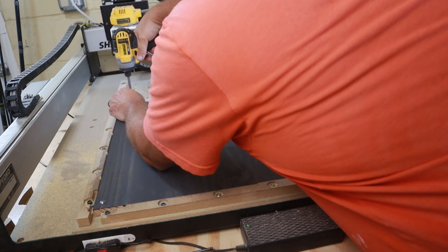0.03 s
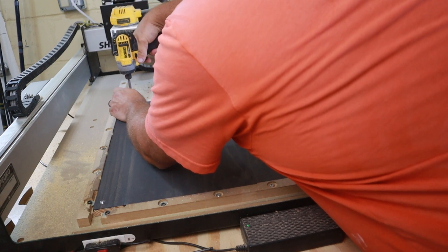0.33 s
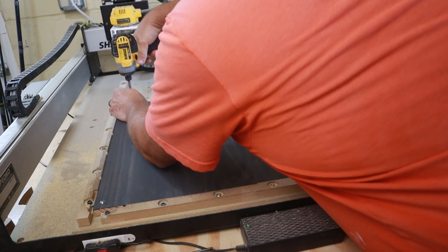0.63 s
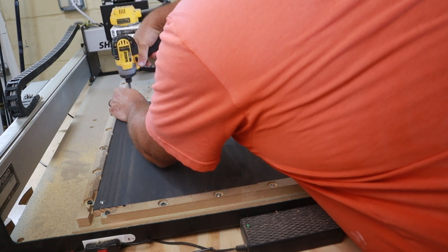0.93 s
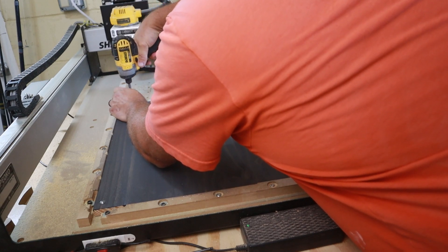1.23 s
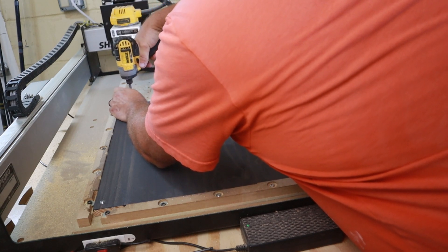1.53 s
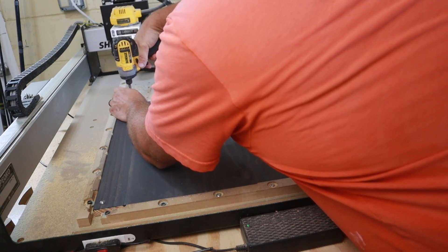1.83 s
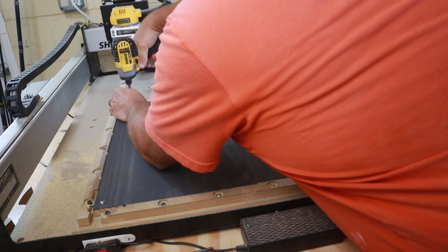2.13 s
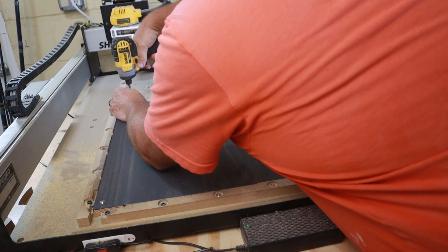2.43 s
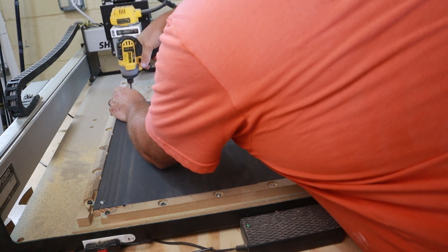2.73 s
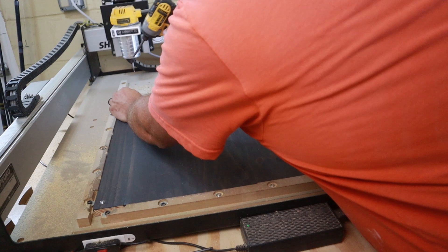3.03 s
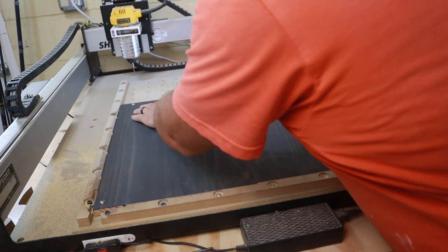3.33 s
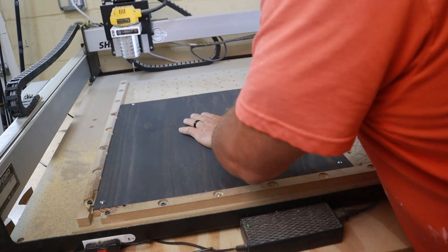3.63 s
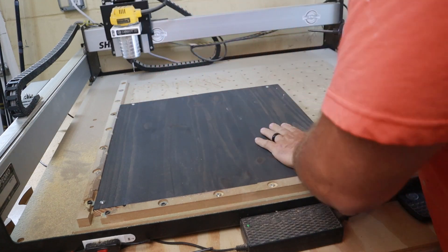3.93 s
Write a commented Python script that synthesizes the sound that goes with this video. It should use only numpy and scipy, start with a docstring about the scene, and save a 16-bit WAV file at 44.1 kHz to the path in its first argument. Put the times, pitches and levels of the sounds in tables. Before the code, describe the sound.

A cordless drill whirs in short bursts, then its clutch ratchets as the screw tightens.

```python
"""A small workshop, heard in mono from one microphone position. A cordless drill runs a screw into a
sheet on a machine bed: first five short bursts of whirring gears, then, from about 1.5 s, four in
which the screw is tight and the clutch ratchets, shaking the bed. From about 2.8 s the drill is put
down with a few knocks and a hand slides over the sheet. A machine hums low behind it all."""
import sys
import numpy as np
from scipy import signal
from scipy.fft import rfft, irfft
from scipy.io import wavfile
from scipy.ndimage import uniform_filter1d

SR = 44100
rng = np.random.default_rng(int(sys.argv[2]) if len(sys.argv) > 2 else 0)


def inscribe(sig):
    """Save sig as 16-bit PCM at rate SR to the path in sys.argv[1].

    A 1-D sig is mono; a 2-D sig holds one channel per row.
    Samples are clipped to [-1, 1] before scaling.
    """
    pcm = np.round(np.clip(np.atleast_2d(sig).T, -1, 1) * 32767)
    wavfile.write(sys.argv[1], SR, pcm.astype(np.int16))


N = 176400
T = np.arange(N) / SR

# At the drill, one list per trigger pull. Each row: time in seconds, gear mesh rate in Hz, level in dB.
TRIGGER_PULLS = [
    [(0, 1111, -23.5), (.02, 1067, -25.5), (.07, 701, -36), (.13, 348.4, -47.5), (.19, 197.5, -49)],
    [(.208, 199.4, -51), (.216, 343.8, -35.5), (.26, 682.5, -21), (.28, 821, -23.5), (.296, 900, -24),
     (.33, 951, -21.5), (.352, 916, -23.5), (.372, 740, -34), (.425, 562, -30), (.53, 251, -52.5)],
    [(.55, 249.4, -35), (.59, 411, -28.5), (.62, 465, -26), (.66, 498.2, -25.5), (.705, 499.5, -24.5),
     (.73, 473, -28), (.76, 429, -36), (.815, 300, -59)],
    [(.828, 331.5, -35), (.86, 540, -25), (.886, 715.5, -18.5), (.907, 800.3, -26.5), (.922, 823, -24.5),
     (.937, 844, -24.5), (.957, 856, -20.5), (.974, 843.5, -26), (.992, 679, -27), (1.03, 474.5, -40.5),
     (1.07, 339.5, -35.5), (1.15, 200, -59.5)],
    [(1.18, 252.6, -34), (1.25, 319.5, -37), (1.3, 348.5, -31), (1.335, 348.7, -35), (1.375, 349.2, -54),
     (1.422, 346.3, -53)],
    [(1.44, 279.4, -36), (1.472, 440, -29), (1.49, 500, -28), (1.51, 521, -23), (1.555, 400, -36),
     (1.64, 381, -41.5), (1.69, 358.7, -33.5), (1.738, 249, -40.5)],
    [(1.75, 276, -30.5), (1.772, 477.6, -29), (1.81, 420, -34), (1.92, 400, -42), (1.97, 373, -33),
     (2.025, 251.7, -38)],
    [(2.038, 278.9, -38.5), (2.06, 475.6, -25), (2.09, 420, -36.5), (2.18, 400.5, -42.5),
     (2.22, 372.2, -33.5), (2.298, 200, -48.5)],
    [(2.315, 282.3, -42), (2.34, 478.5, -34), (2.41, 419.7, -34.5), (2.52, 400, -38.5), (2.565, 346.5, -39),
     (2.63, 219.3, -55), (2.72, 99.7, -75)],
]
# Gear tones. Each row: multiple of the mesh rate, level in dB.
GEAR_HARMONICS = [(1, 0), (2, 1), (3, -0.5), (4, 2.5), (5, 0), (6, 0.5), (7, -1.5), (8, -6), (10, -4)]
# The speed controller at part throttle. Each row: start in seconds, end in seconds, level in dB.
WHINE_SPANS = [(0.207, 0.264, -39.5), (0.541, .88, -47.5), (1.154, 1.48, -48)]
# Its partials. Each row: multiple of the whine's pitch, level in dB.
WHINE_HARMONICS = [(1, 4), (2, -1), (3, -37)]
# At the screw. Each row: start in seconds, length in seconds, starting pitch in Hz, level in dB.
SCREW_SQUEAKS = [(0.107, 0.009, 12700, -45), (0.487, .036, 13400, -50.5)]
# Blows on the bed. Each row: start in seconds, clack level in dB, thud level in dB.
BED_KNOCKS = [(1.078, -35, -44), (1.081, -17, -14.5), (1.093, -34, -23.5), (1.144, -46, -28.5),
              (2.845, -57, -67), (2.851, -40, -74.5), (2.866, -50.5, -68.5), (3.192, -50, -51),
              (3.533, -27, -20), (3.556, -41, -26.5), (3.573, -30.5, -36), (3.6209, -35.5, -25),
              (3.677, -45, -41), (3.718, -49.5, -43), (3.819, -51.5, -46)]
# Resonances of bed and sheet. Each row: frequency in Hz, level in dB, seconds to fall by 60 dB.
BED_MODES = [(228.6, -3, 0.26), (324.3, -5, 0.13), (366, 3, 0.19), (403, 7, 0.14), (498, 0.5, 0.49),
             (536.2, 5, 0.22), (610, -3, 0.17), (859, -7.5, 0.089), (959.6, -10.5, 0.12),
             (1137, -10.5, 0.061), (1230, -1.5, 0.11), (1370, -2, 0.096)]
# The workshop's reverberation. Each row: frequency in Hz, seconds to fall by 60 dB.
ROOM_DECAY = [(100, 0.61), (500, 0.56), (2000, 0.37), (6000, 0.26), (16000, 0.32)]

# Small impacts. Each row: start in seconds, level in dB.
CLUTCH_SNAPS = [(1.515, 0.5), (1.518, 2.5), (1.525, 5), (1.533, -24), (1.546, -6.5), (1.576, -0.5),
                (1.586, 1.5), (1.603, -2), (1.771, -0.5), (1.7745, 2), (1.778, 1), (1.785, -0.5),
                (1.797, -9.5), (1.815, -1), (1.8215, -0.5), (1.8535, 1.5), (1.8855, 1), (1.898, -10.5),
                (2.055, -2.5), (2.062, 1.5), (2.0695, 5.5), (2.081, -4.5), (2.097, -8), (2.103, 0),
                (2.131, -5), (2.1355, 0), (2.139, -12), (2.15, -4.5), (2.339, -1.5), (2.3435, 2),
                (2.351, 1.5), (2.358, -9.5), (2.365, -6), (2.386, -10), (2.392, -0.5), (2.403, -18),
                (2.4265, 1), (2.462, -6.5), (2.467, -3), (2.476, -2.5), (2.488, -6)]
BRIGHT_CLICKS = [(.361, -11.5), (.474, -30), (.551, -22), (.555, -17), (1.081, -19), (1.154, -25.5),
                 (1.1775, -18), (1.7425, -15.5), (2.0305, -14), (2.3052, -19.5), (2.851, -54)]

# Level curves. Each row: time in seconds, level in dB.
BED_COUPLING = [(0, -12.5), (1, -23), (1.25, -8.5), (1.48, -23.5), (1.6, -1), (2.3, -0.5), (2.6, 2.5)]  # gear shake passed down into the bed
SLIDE_LEVEL = [(3.05, -78.5), (3.22, -64), (3.34, -58.5), (3.44, -59), (3.48, -80), (3.62, -51.5),
               (3.68, -56), (3.77, -63), (3.85, -57.5), (3.95, -59.5), (4, -47)]  # the hand on the sheet
HUM_LEVEL = [(0, -56), (.14, -48), (.4, -55), (.88, -53), (1, -61), (1.47, -58), (1.58, -80), (1.75, -69),
             (1.9, -77), (2.7, -71.5), (3.5, -61.5), (3.7, -69), (3.85, -58), (4, -62)]  # the machine in the background

# Tone colours as they reach the microphone. Each row: frequency in Hz, relative level in dB.
HOUSING_SPECTRUM = [(100, -27), (380, -4.5), (540, -6.5), (720, -1.5), (930, -3), (1120, -7.5), (1400, 0),
                    (1900, 0), (2700, -1), (3300, 1.5), (3900, -5.5), (4600, 7.5), (5200, 0.5), (5900, -8),
                    (8000, -5), (16000, -24)]  # what the housing lets out of the gear tones
RATTLE_SPECTRUM = [(60, -26.5), (160, -17), (230, -3), (290, -23), (380, -1.5), (580, -13), (700, -4.5),
                   (920, -1), (1100, -6), (1500, -2), (2400, 2), (3400, 2), (4900, 0), (6000, -3),
                   (9000, -12), (12500, -16.5), (16000, -34)]  # rattling gear teeth
SHEET_SPECTRUM = [(60, -35), (120, -18.5), (220, -4.5), (330, 1), (520, 1.5), (620, 2), (740, -2),
                  (940, 0.5), (1120, -7.5), (1370, 0.5), (2000, -10), (3200, -13.5), (8000, -28)]  # dull rumble of the clamped sheet
SNAP_SPECTRUM = [(60, -50.5), (160, -12.5), (400, -18), (720, 5), (950, 9), (1500, -0.5), (2300, 5),
                 (3200, -1), (4500, 1), (6500, 0), (9000, -8), (12000, -13.5), (16000, -26.5)]  # clutch dogs
CLICK_SPECTRUM = [(100, -18.5), (600, -4), (2000, 5), (4500, 6), (7000, 2), (11000, -8.5), (16000, -21)]  # bright ticks
CLACK_SPECTRUM = [(100, -10.5), (400, -22), (680, 3.5), (1000, 4.5), (1300, 4), (2600, 1.5), (3500, -6.5),
                  (4500, -9), (7500, -16.5), (10000, -28), (16000, -44)]  # hard edge of a knock
THUD_SPECTRUM = [(40, -43.5), (110, -21), (200, -6), (290, -0.5), (370, 4), (480, -11.5), (630, 1),
                 (850, -12), (1500, -23.5), (5000, -46)]  # low body of a knock
FLEX_SPECTRUM = [(50, -38), (110, -9), (165, 4), (220, 0), (290, -11.5), (420, 0.5), (600, -5.5),
                 (900, -17.5), (3000, -41.5)]  # the bed flexing under a heavy knock
SLIDE_SPECTRUM = [(100, -2), (300, 0.5), (800, -3), (1700, -1), (2700, -9), (4500, -10), (8000, -15.5),
                  (16000, -28.5)]  # skin on the sheet
AIR_SPECTRUM = [(15, -43), (25, -7.5), (63, -11.5), (108, -5), (516, -6), (1190, -18), (1740, -13.5),
                (2480, -25.5), (7310, -31.5), (16000, -47.5)]  # room tone


def gears(jitter=0.00787, flicker_db=4.5, full_throttle_db=-21, tight_s=1.54):
    """Mesh tones and tooth rattle follow the motor speed; pressing on the screw shakes the bed."""
    throttle = [row for pull in TRIGGER_PULLS for row in pull]
    level_db = curve(throttle, column=2)
    mesh_cycles = np.cumsum(curve(throttle) * (1 + jitter * drift(rate_hz=66))) / SR
    tones = np.zeros(N)
    for multiple, db in GEAR_HARMONICS:
        gain = amp(db + flicker_db * drift(rate_hz=110))
        tones += gain * np.sin(2 * np.pi * (multiple * mesh_cycles + rng.random()))
    teeth = 1 + 0.44 * np.cos(2 * np.pi * mesh_cycles)
    rattle = unit(rng.standard_normal(N) * teeth * amp(2 * drift(rate_hz=790)))
    # The tones sink into the rattle below full throttle, and drop 1 dB once the screw is tight.
    tone_db = -3 + 0.2 * np.minimum(level_db - full_throttle_db, 0) - 1 * (T > tight_s)
    whir = amp(tone_db) * unit(colour(tones, HOUSING_SPECTRUM))
    whir += amp(-2.5) * unit(colour(rattle, RATTLE_SPECTRUM))
    shake = amp(level_db + curve(BED_COUPLING)) * rattle
    return amp(level_db) * whir + colour(shake, SHEET_SPECTRUM) + amp(-7) * bed(shake)


def clutch(rise_s=0.00047):
    """Metal dogs slip and snap back; the sheet booms and the bed rings under them."""
    snaps = bursts(CLUTCH_SNAPS, fall_s=0.0036, rise_s=rise_s)
    boom = colour(bursts(CLUTCH_SNAPS, fall_s=0.006, rise_s=rise_s), SHEET_SPECTRUM)
    return amp(-14) * (colour(snaps, SNAP_SPECTRUM) + amp(-11.5) * boom + amp(-9.5) * bed(snaps))


def clicks():
    """Short bright ticks from the trigger, the bit and the hard edge of some knocks."""
    return colour(bursts(BRIGHT_CLICKS, fall_s=0.0023), CLICK_SPECTRUM)


def controller(pitch_hz=3920):
    """The chopped motor current sings with a thin whine of steady pitch."""
    gate = sum(amp(db) * ((T > start) & (T < end)) for start, end, db in WHINE_SPANS)
    whine = sum(amp(db + 1.5 * drift(rate_hz=20)) * np.sin(2 * np.pi * multiple * pitch_hz * T)
                for multiple, db in WHINE_HARMONICS)
    return uniform_filter1d(gate, size=300) * unit(whine)


def squeaks(rise_hz_per_s=36000):
    """The turning screw gives a short rising whistle as the motor runs down."""
    whistles = np.zeros(N)
    for start, length, hz, db in SCREW_SQUEAKS:
        t = np.clip(T - start, 0, length)
        pitch = hz * (1 + 0.008 * drift(rate_hz=412)) + rise_hz_per_s * t
        whistles += amp(db) * np.sin(np.pi * t / length) * np.sin(2 * np.pi * np.cumsum(pitch) / SR)
    return whistles


def knocks():
    """A hard clack and a low thud that rings the bed; the deep boom grows with the blow squared."""
    clacks = [(start, db) for start, db, _ in BED_KNOCKS]
    blows = [(start, db) for start, _, db in BED_KNOCKS]
    flexes = [(start, 2 * db + 5.5) for start, db in blows]
    clack = colour(bursts(clacks, fall_s=0.0068), CLACK_SPECTRUM)
    chatter = amp(-9) * bursts(blows, fall_s=0.0035)
    thud = colour(pushes(blows) + chatter, THUD_SPECTRUM)
    boom = colour(bursts(flexes, fall_s=0.013), FLEX_SPECTRUM)
    return clack + amp(-5) * thud + amp(-17) * bed(thud) + boom


def bed(force):
    """The machine bed and its sheet ring in decaying modes when shaken or struck."""
    t = T[:SR // 2]
    modes = sum(amp(db - 60 * t / t60) * np.sin(2 * np.pi * (hz * t + rng.random()))
                for hz, db, t60 in BED_MODES)
    return ring(force, modes)


def hand(rasp_hz=3520, rasp_start_s=3.82, swell_s=0.023):
    """Skin rubs over the sheet, with a thin, narrow rasp on the last slide."""
    friction = rng.standard_normal(N) * amp(1.5 * drift(rate_hz=160))
    rub = amp(curve(SLIDE_LEVEL)) * unit(colour(friction, SLIDE_SPECTRUM))
    rasp = unit(drift(rate_hz=160) * np.sin(2 * np.pi * rasp_hz * T))
    swell = np.clip((T - rasp_start_s) / swell_s, 0, 1)
    return rub + amp(-66) * swell * rasp


def workshop(direct, tail_db=-9, build_s=0.012):
    """The nearby walls send a short tail back to the microphone behind the direct sound."""
    hz, seconds, spectrum = signal.stft(rng.standard_normal(SR), SR, nperseg=256)
    decay = amp(-60 * seconds / at_frequency(ROOM_DECAY, hz)[:, None])
    tail = signal.istft(spectrum * decay, SR, nperseg=256)[1]
    tail *= np.minimum(T[:len(tail)] / build_s, 1)
    return direct + amp(tail_db) * ring(direct, tail)


def room_tone(hum_hz=59.1, air_db=-66.5):
    """Behind the work, a machine's wavering hum and still air."""
    hum = unit(np.sin(2 * np.pi * hum_hz * T) * (1 + 0.14 * drift(rate_hz=35)))
    air = unit(colour(rng.standard_normal(N), AIR_SPECTRUM))
    return amp(curve(HUM_LEVEL)) * hum + amp(air_db) * air


def bursts(rows, fall_s, rise_s=0.00021):
    """A quickly dying crack of noise for each row of start and level."""
    power = np.zeros(N)
    t = T[:SR // 10]
    shape = (1 - np.exp(-t / rise_s)) * np.exp(-t / fall_s)
    for start, db in rows:
        span = power[round(start * SR):][:len(t)]
        span += (amp(db) * shape[:len(span)]) ** 2
    return np.sqrt(power) * rng.standard_normal(N)


def pushes(rows, length_s=0.0025):
    """One clean impulse for each row, with the energy of a steady burst of that length."""
    impulses = np.zeros(N)
    for start, db in rows:
        impulses[round(start * SR)] = amp(db) * np.sqrt(length_s * SR)
    return impulses


def drift(rate_hz):
    """Random motion of rms 1, rolled off above rate_hz."""
    rolloff = 1 + (np.fft.rfftfreq(N, 1 / SR) / rate_hz) ** 4
    return unit(irfft(rfft(rng.standard_normal(N)) / rolloff, N))


def colour(x, spectrum, size=4096):
    """Minimum-phase filter shaped like the given spectrum."""
    hz = abs(np.fft.fftfreq(size, 1 / SR))
    log_gain = np.log(amp(at_frequency(spectrum, hz)))
    response = np.fft.ifft(np.exp(np.conj(signal.hilbert(log_gain)))).real
    return ring(x, response[:size // 2])


def ring(x, response):
    """Passes x through an impulse response scaled to unit energy."""
    return signal.fftconvolve(x, response / np.linalg.norm(response))[:N]


def curve(points, column=1):
    """One column of a time table, at every sample."""
    rows = np.array(points, float)
    return np.interp(T, rows[:, 0], rows[:, column])


def at_frequency(points, hz):
    """Interpolates a table on a log-frequency axis."""
    frequencies, values = np.transpose(points)
    return np.interp(np.log(hz + 1), np.log(frequencies), values)


def amp(db):
    """Decibels to gain."""
    return 10 ** (np.asarray(db) / 20)


def unit(x):
    """Scales to rms 1."""
    return x / np.sqrt(np.mean(x ** 2) + 1e-20)


def scene():
    """The workshop from one microphone position, the same in both channels."""
    work = gears() + clutch() + clicks() + knocks() + hand() + squeaks()
    mono = workshop(work) + controller() + room_tone()
    return np.array([mono, mono])


def record(dry, ceiling=0.54, cutoff_hz=16200):
    """After the microphone, the loudest peaks are rounded off and the top treble is cut."""
    rounded = dry / (1 + (dry / ceiling) ** 4) ** (1 / 4)
    lowpass = signal.firwin(511, cutoff_hz, window=("kaiser", 9), fs=SR)
    return signal.oaconvolve(rounded, lowpass[None], "same")


dry = scene()
out = record(dry)
inscribe(out)
```